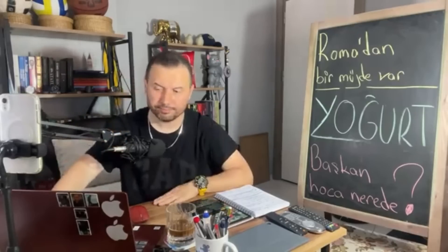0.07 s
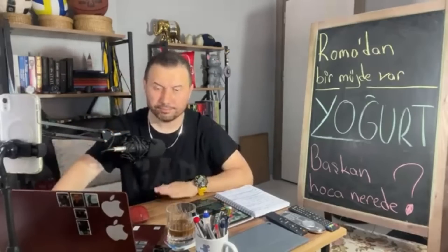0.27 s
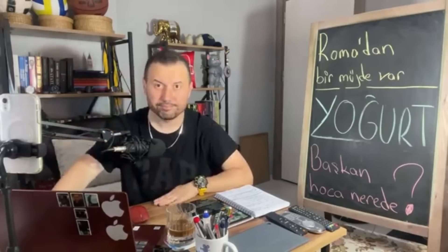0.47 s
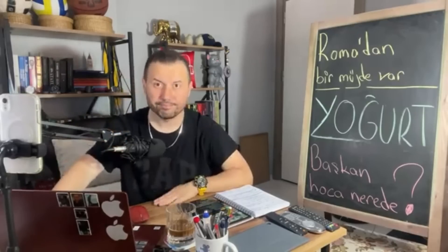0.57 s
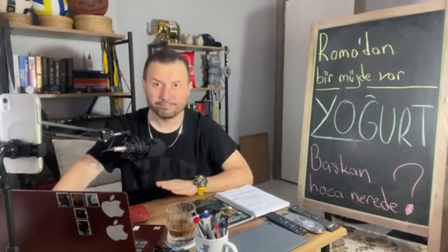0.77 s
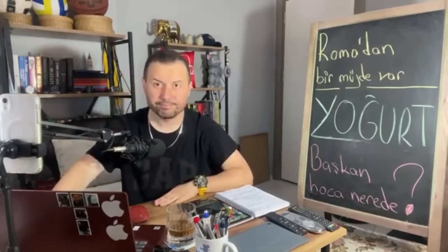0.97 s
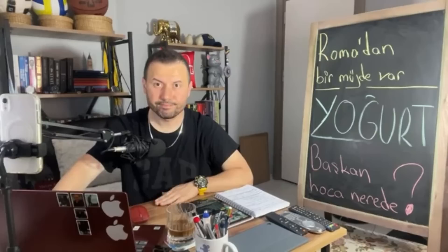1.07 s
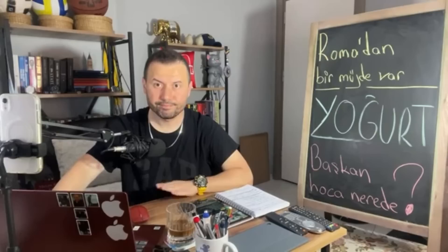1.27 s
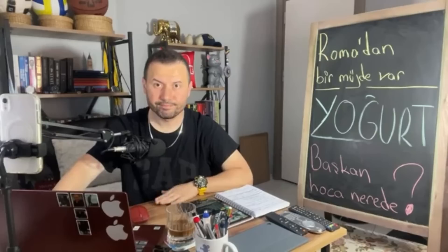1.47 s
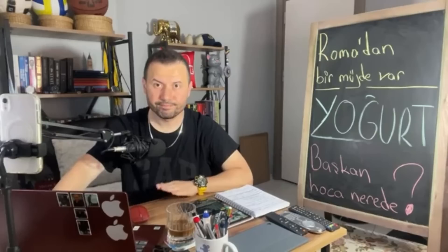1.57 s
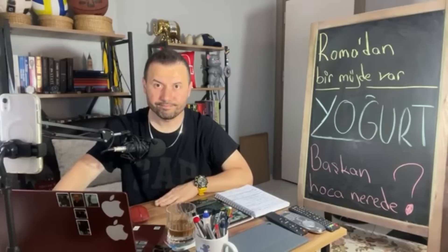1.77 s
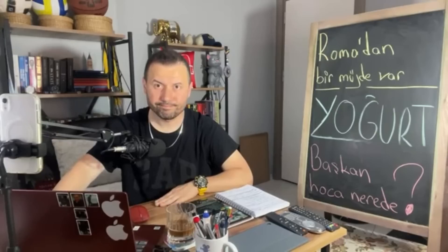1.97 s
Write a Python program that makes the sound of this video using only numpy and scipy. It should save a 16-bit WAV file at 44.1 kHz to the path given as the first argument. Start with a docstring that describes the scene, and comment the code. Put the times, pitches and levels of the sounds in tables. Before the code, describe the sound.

Palm knocks on a wooden desk, heard close in a quiet little room. An earlier one dies away, then four follow, slightly quickening, each a smack and deep thud trailed by light rattling and a faint low flutter.

```python
"""An earlier knock dies away; then a flat hand knocks on a wooden desk, a little quicker each time.
Each knock is a brush of fingers, a sharp smack and the low boom of the desk top. Things on the desk
ring and rattle, and a low flutter, probably a spring in the microphone arm, follows.
The microphone is close, the room small and quiet."""
import sys
import numpy as np
from scipy import signal
from scipy.fft import rfft, irfft, next_fast_len
from scipy.io import wavfile

SR = 44100
rng = np.random.default_rng(int(sys.argv[2]) if len(sys.argv) > 2 else 0)


def pcm_store(signal):
    """Save signal as 16-bit PCM."""
    levels = np.round(np.clip(np.atleast_2d(signal), -1, 1) * 32767)
    wavfile.write(sys.argv[1], SR, levels.astype(np.int16).T)


N = 88288


def amp(db):
    """Decibels to gain."""
    return 10 ** (np.asarray(db) / 20)


def along(points, hz):
    """Interpolate (Hz, value) points on a log frequency axis."""
    point_hz, values = np.transpose(points)
    return np.interp(np.log(hz + 1), np.log(point_hz + 1), values)


def clock():
    """Time axis of one sound, 1 s long."""
    return np.arange(SR) / SR


def add(track, start_s, sound):
    """Mix a sound into the track."""
    start = int(round(start_s * SR))
    a, b = max(start, 0), min(start + len(sound), len(track))
    if b > a:
        track[a:b] += sound[a - start:b - start]


def noise(colour, size=SR):
    """Coloured noise of rms 1."""
    gain = amp(along(colour, np.fft.rfftfreq(size, 1 / SR)))
    x = irfft(rfft(rng.standard_normal(size)) * gain, size)
    return x / x.std()


def bump(t, sigma_s):
    """Gaussian pulse, peak 1 at t = 0."""
    return np.exp(-.5 * (t / sigma_s) ** 2)


def rise(rise_s):
    """Smooth onset, 0 to 1."""
    return 1 - np.exp(-(clock() / rise_s) ** 2)


def fade(t60_s):
    """Exponential decay."""
    return np.exp(-np.log(1000) * clock() / t60_s)


def burst(colour, rise_s, t60_s):
    """Noise that rises and dies away."""
    return noise(colour) * rise(rise_s) * fade(t60_s)


def ringing(modes, scatter_db=0):
    """Damped modes struck together."""
    return sum(amp(db + scatter_db * rng.standard_normal())
               * np.sin(2 * np.pi * hz * clock()) * fade(t60_s) for hz, db, t60_s in modes)


# Each row: frequency in Hz, noise density in dB. Same for every *_COLOUR table.
FLOOR_COLOUR = [(20, -9.5), (45, 12), (90, 9.5), (270, 0), (550, -13.5), (1500, -16), (2500, -23.5),
                (15000, -28.5)]

def room_tone():
    """Faint steady rumble of the room."""
    return amp(-59) * noise(FLOOR_COLOUR, size=N)


# Each row: frequency in Hz, T60 in seconds.
ROOM_DECAY = [(80, 0.87), (300, 0.32), (800, 0.28), (2500, .28), (6000, 0.23), (14000, 0.22)]
REVERB_COLOUR = [(25, -24.5), (45, -7), (90, 0), (200, -2.5), (450, -0.5), (750, -4), (1400, -2.5),
                 (2100, -8), (2900, -6), (5000, -15.5), (7800, -20.5), (10500, -20), (15000, -30.5)]

def reverb(rise_s, colour=REVERB_COLOUR):
    """Room tail; each frequency dies at its own rate."""
    hz, t, spectrum = signal.stft(noise(colour), SR, nperseg=256)
    decay = np.exp(-np.log(1000) * t / along(ROOM_DECAY, hz)[:, None])
    _, tail = signal.istft(spectrum * decay, SR, nperseg=256)
    return tail[:SR] * rise(rise_s)


# Each row: centre in seconds, sigma in seconds, level in dB.
HAND_SLIDES = [(0.225, 0.063, -67.5), (0.45, 0.044, -65.5)]
RUSTLE_COLOUR = [(150, -18.5), (600, 1), (2500, 7.5), (5000, -1), (9000, 0), (15000, -3)]

def rustle():
    """Skin and cloth slide softly between the first knocks."""
    t = np.arange(N) / SR
    envelope = sum(amp(db) * bump(t - s, sigma_s) for s, sigma_s, db in HAND_SLIDES)
    return envelope * noise(RUSTLE_COLOUR, size=N)


# Each row, both tables: delay after the knock in seconds, level in dB.
FLUTTER_THUMPS = [(0.142, -39.5), (0.189, -43.5), (0.235, -41), (0.288, -42.5), (0.336, -43)]
FLUTTER_SWELLS = [(.207, -42.5), (0.291, -46.5)]

def flutter(knock_times_s):
    """Probably the arm's spring: each knock returns as faint falling thumps and deep swells."""
    out, t = np.zeros(N), clock()
    start_hz, end_hz, glide_s, rise_s = 337, 60.6, .0115, .0061
    swell_hz, swell_centre_s = 79.6, .5
    hz = end_hz + (start_hz - end_hz) * np.exp(-t / glide_s)
    envelope = t / rise_s * np.exp(1 - t / rise_s)
    thump = np.sin(2 * np.pi * np.cumsum(hz) / SR) * envelope
    swell_t = t - swell_centre_s
    swell = np.sin(2 * np.pi * swell_hz * swell_t) * bump(swell_t, sigma_s=.015)
    for s in knock_times_s:
        for delay_s, db in FLUTTER_THUMPS:
            tick = amp(-26) * burst(CLACK_COLOUR, rise_s=.001, t60_s=.03)
            add(out, s + delay_s, amp(db) * (thump + tick))
        for delay_s, db in FLUTTER_SWELLS:
            add(out, s + delay_s - swell_centre_s, amp(db) * swell)
    return out


# Each row: start in seconds, level in dB, relative tick level in dB.
RATTLE_HITS = [(0.0512, -9, -19), (.148, -33.5, 4), (.444, -29, -9), (.5086, -9, -5.5), (0.603, -1.5, 0),
               (0.6988, -19, -8), (1.0516, -0.5, 1), (1.132, -21, -8.5), (1.4582, -5, -3.5),
               (1.8304, -9.5, 2.5)]
# Each row: frequency in Hz, level in dB, T60 in seconds. Same for every *_MODES table.
LOOSE_MODES = [(1755, -32, 0.049), (2012, -33, 0.042), (2597, -40, 0.035), (3105, -33.5, 0.029),
               (3323, -37.5, 0.035)]
RATTLE_COLOUR = [(400, -15.5), (1300, -3.5), (1750, 2.5), (2050, -2), (2450, -2.5), (3250, -1.5),
                 (4200, -11.5), (5300, -11.5), (7000, -22), (15000, -28.5)]

def rattles():
    """Small loose things tick against the desk and ring briefly."""
    out = np.zeros(N)
    for s, db, tick_db in RATTLE_HITS:
        tick = amp(tick_db - 25) * burst(RATTLE_COLOUR, rise_s=.00035, t60_s=.011)
        ring = amp(-1) * ringing(LOOSE_MODES, scatter_db=2)
        tail = amp(-42.5) * reverb(rise_s=.0021, colour=RATTLE_COLOUR)
        add(out, s, amp(db) * (tick + ring + tail))
    return out


GLASS_MODES = [(2743, -28, 0.21), (2840, -32.5, 0.058), (3229, -43.5, 0.084), (3784, -49, .13),
               (5700, -50, 0.08)]

def glass(db):
    """Probably a drinking glass, set ringing through the desk."""
    return amp(db) * ringing(GLASS_MODES, scatter_db=4)


BRUSH_COLOUR = [(200, 9.5), (1000, -6), (2500, -2), (4500, -8.5), (8000, -19), (15000, -25.5)]

def finger_brush(out, s, db):
    """Fingertips land first and brush the wood."""
    lead_s = .0048
    swell = burst(BRUSH_COLOUR, rise_s=.00024, t60_s=.021)[::-1]
    add(out, s - 1, amp(db - 26) * swell)  # ends on the knock
    add(out, s - lead_s, amp(db - 32.5) * burst(BRUSH_COLOUR, rise_s=.00023, t60_s=.037))


SMACK_COLOUR = [(300, -9), (1200, -10), (2100, -9), (2650, 7), (3600, -14), (4400, -4), (5400, 1),
                (6800, -3.5), (8000, -12.5), (11000, -6), (15000, -18.5)]

def smack(out, s, db, pop_hz, pop_db):
    """The hand smacks; air trapped under it pops."""
    add(out, s - .0002, amp(db - 11) * burst(SMACK_COLOUR, rise_s=.00018, t60_s=.0062))
    add(out, s, amp(pop_db - 13) * np.sin(2 * np.pi * pop_hz * clock()) * fade(t60_s=.0077))


PALM_DELAY_S = .0058
DESK_UPPER_MODES = [(352.4, -40, 0.3), (562, -44.5, 0.23), (666, -38, 0.22), (836, -29, 0.1),
                    (948, -29, .06), (1157, -34.5, 0.14), (1381, -26.5, 0.096), (1456, -27, .06),
                    (1650, -39.5, 0.091)]
CLACK_COLOUR = [(200, -12.5), (450, -0.5), (700, -4.5), (950, -1), (1400, -6.5), (2000, -28.5), (2900, -3),
                (4500, -22.5), (8000, -23.5), (15000, -31.5)]

def wood_clack(out, s, db):
    """The wood clacks; the landing palm then strikes its upper modes."""
    add(out, s, amp(db - 18) * burst(CLACK_COLOUR, rise_s=.0015, t60_s=.031))
    wood = ringing(DESK_UPPER_MODES, scatter_db=3)
    palm = amp(-19.5) * burst(CLACK_COLOUR, rise_s=.00085, t60_s=.044)
    add(out, s + PALM_DELAY_S, amp(db) * (wood + palm))


DESK_LOW_MODES = [(51.6, -35, 0.661), (68.0, -37.5, 0.84), (88, -15, 0.135), (125.7, -29.5, 0.49),
                  (141.2, -31.5, 0.613), (173, -7, 0.027), (161.8, -36.5, 0.819), (201.3, -22.5, 0.46),
                  (235, -19.5, 0.307), (267.4, -24.5, 0.23), (291, -26.5, 0.44), (306.2, -12, 0.15),
                  (391.5, -24, 0.282), (460, -21, 0.196)]

def boom(out, s, db, softness_ms):
    """The palm pushes air ahead, then drives the desk top; a softer palm loses the higher modes."""
    pad_s, lag_s, air_lead_s, rebound_s = .01, .0017, .0021, .0584
    t = clock() - pad_s
    force = bump(t, sigma_s=softness_ms / 1000)
    desk = -signal.fftconvolve(ringing(DESK_LOW_MODES), force / force.sum())[:SR]
    air = amp(-10) * bump(t + air_lead_s, sigma_s=.00068)
    add(out, s - pad_s + lag_s, amp(db) * (desk + air))
    add(out, s - pad_s + rebound_s, amp(db - 18) * desk)  # the desk settles back


# Each row: start in seconds, boom in dB, palm softness in ms, clack, smack, brush and glass in dB,
# air pop pitch in Hz, pop and room in dB. Levels are trims on each layer.
HAND_KNOCKS = [(-.042, -4, 0.47, -11, 6, -11, -9.5, 3000, -5, 0),
               (0.5301, -1.5, 0.83, -9.5, -1, 3, -11.5, 2650, -1.5, -3.5),
               (0.9732, -0.5, 0.4, 2, -4, 4.5, -9, 2690, -6.5, 0),
               (1.3905, -0.5, 0.49, 1, -1, -1.5, -3, 3760, 3, 0.5),
               (1.7665, -2, 0.54, -1, 0, -1, -4.5, 4270, -1.5, -1)]

def knocks():
    """A flat hand strikes the desk; glass and room answer."""
    out = np.zeros(N)
    for (s, boom_db, softness_ms, clack_db, smack_db, brush_db, glass_db,
         pop_hz, pop_db, room_db) in HAND_KNOCKS:
        boom(out, s, boom_db, softness_ms)
        finger_brush(out, s, brush_db)
        smack(out, s, smack_db, pop_hz, pop_db)
        wood_clack(out, s, clack_db)
        add(out, s + PALM_DELAY_S, glass(glass_db))
        add(out, s, amp(room_db - 29.5) * reverb(rise_s=.0044))
    return out


def scene():
    """Desk sounds over room tone, mono."""
    knock_times_s = [s for s, *_ in HAND_KNOCKS]
    return (knocks() + rattles() + flutter(knock_times_s) + rustle() + room_tone())[None]


def record(dry):
    """Microphone: bass cut and steep upper band limit."""
    low_cut_hz, top_hz = 42, 15200
    size = next_fast_len(N + SR // 2)
    hz = np.fft.rfftfreq(size, 1 / SR)
    highpass = signal.cheby1(N=5, rp=1, Wn=low_cut_hz, btype="high", fs=SR, output="sos")
    spectrum = rfft(signal.sosfilt(highpass, dry), size)
    return irfft(spectrum / np.sqrt(1 + (hz / top_hz) ** 90), size)[:, :N]


dry = scene()
out = record(dry)
pcm_store(out)
```